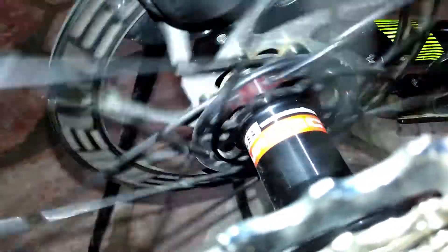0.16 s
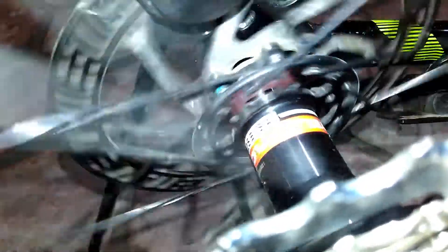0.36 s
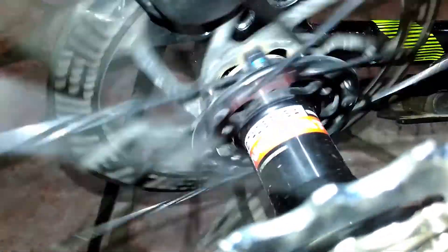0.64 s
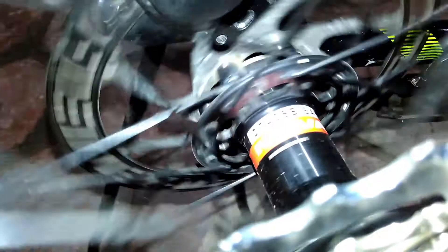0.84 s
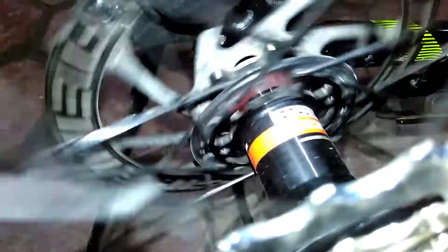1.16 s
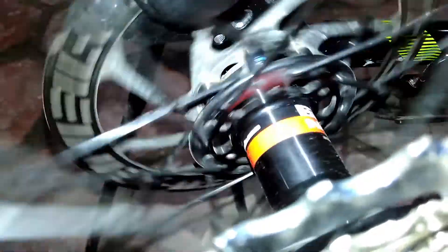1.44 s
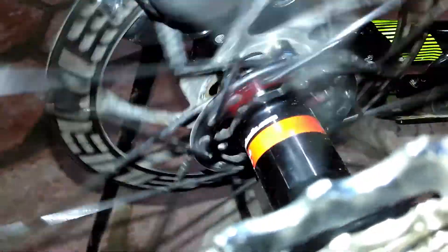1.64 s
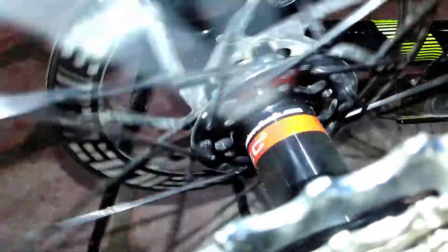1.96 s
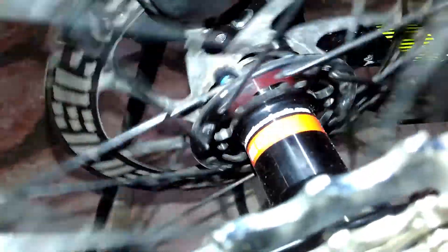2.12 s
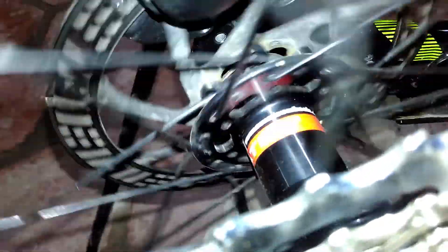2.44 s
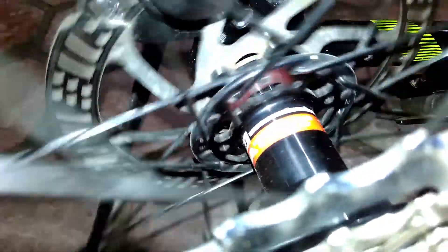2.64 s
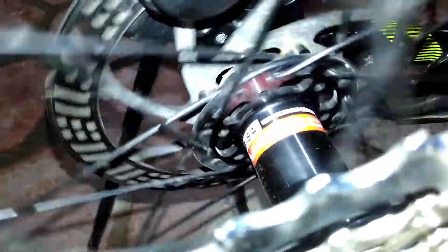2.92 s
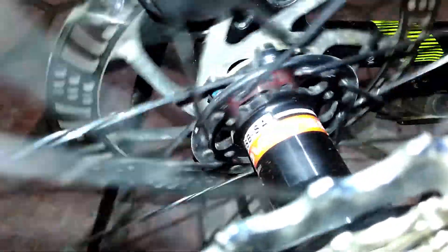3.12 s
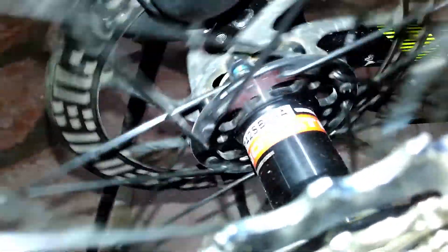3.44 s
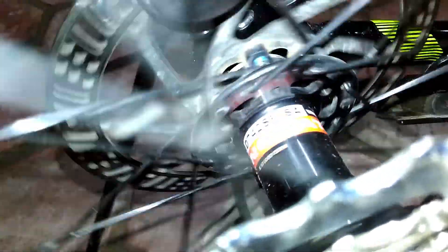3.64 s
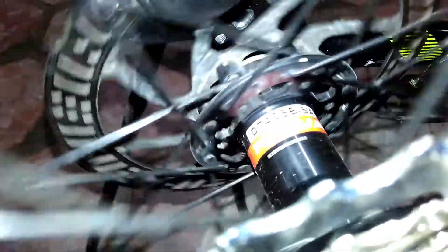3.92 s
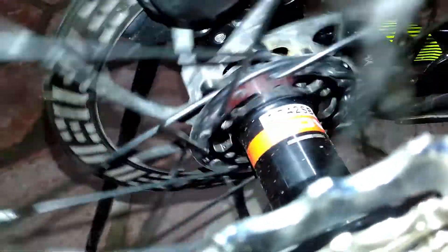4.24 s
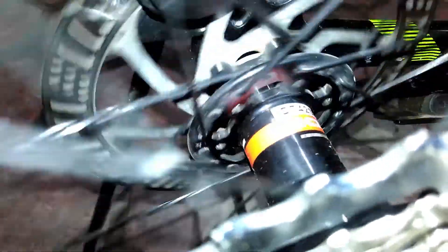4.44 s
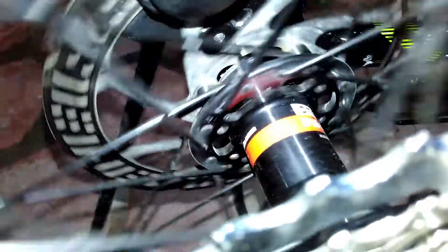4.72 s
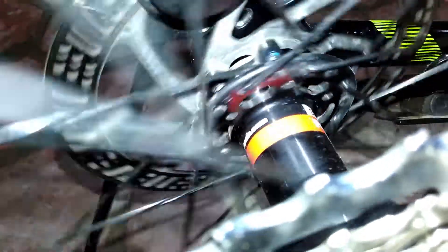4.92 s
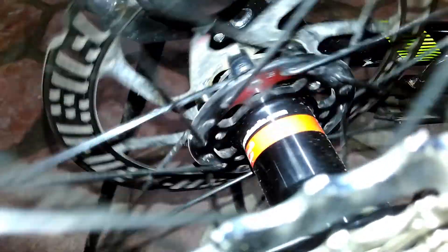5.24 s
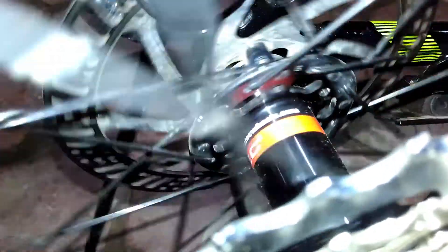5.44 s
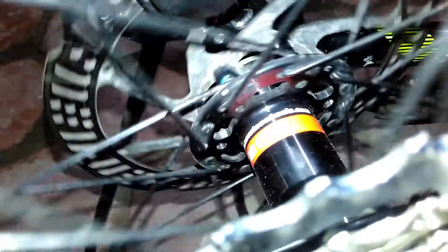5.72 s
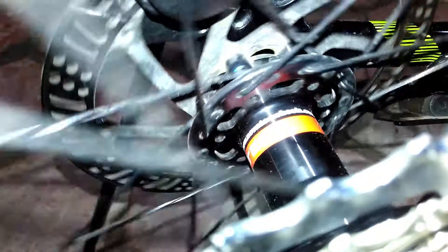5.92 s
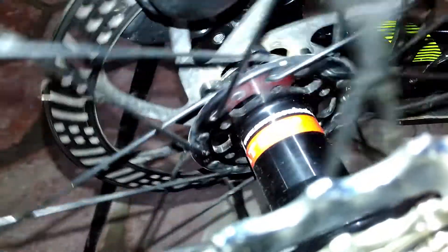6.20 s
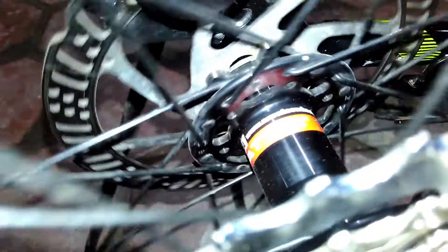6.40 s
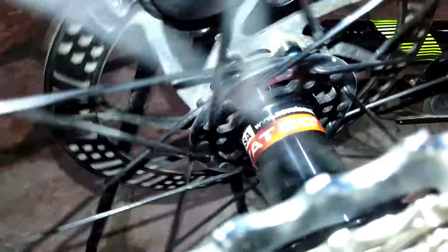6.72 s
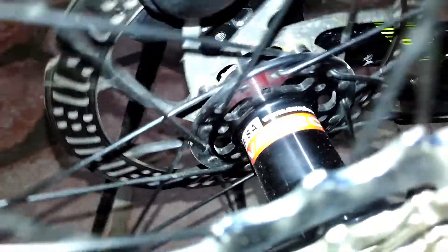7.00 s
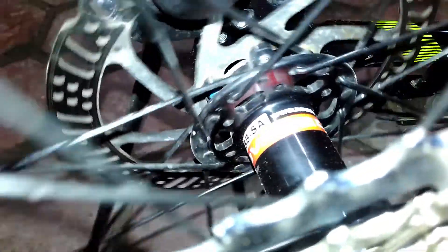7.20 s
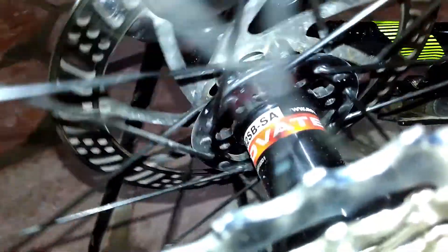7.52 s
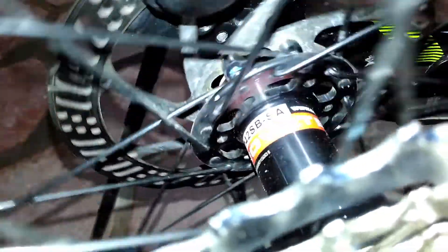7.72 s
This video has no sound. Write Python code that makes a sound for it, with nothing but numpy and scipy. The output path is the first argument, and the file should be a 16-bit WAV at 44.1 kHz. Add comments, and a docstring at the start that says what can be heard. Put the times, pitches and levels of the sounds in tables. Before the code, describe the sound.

A bicycle wheel coasts outdoors with the microphone right by its rear hub. The ratchet gives loud, bright, metallic clicks, each with a brief ring, mostly on the left and slightly overloaded. They begin as a quick run and gradually spread out, still ticking at the end. Underneath, a low drone like a nearby motor fades away over a faint hiss.

```python
"""Outdoors, close to the hub of a bicycle wheel that is coasting down. The freehub pawls drop off each
ratchet tooth and set hub, rotor and spokes ringing; a soft rubbing swish and a lone spoke tick pass.
The left microphone port sits by the hub and overloads. The right one is covered and hears mostly a low
drone, probably a motor nearby, that fades away over a faint outdoor hiss."""
import sys
import numpy as np
from scipy import signal
from scipy.fft import rfft, irfft
from scipy.io import wavfile

SR = 44100
rng = np.random.default_rng(int(sys.argv[2]) if len(sys.argv) > 2 else 0)


def store_pcm(level_fs):
    """Save levels as 16-bit WAV."""
    pcm = np.round(np.clip(level_fs, -1, 1) * 32767).astype(np.int16)
    wavfile.write(sys.argv[1], SR, np.atleast_2d(pcm).T)


N = 346626

# one row a ratchet tooth: t/s, bouncing time/ms, delay of the hardest pawl/ms, its relative level/dB
TEETH = [(0.0, 1.3, 2.43, -11.5), (0.085, 6.7, 3, -15), (0.1705, 7.7, 7.4, -10.5), (0.259, 6.7, 4, -12),
         (0.3466, 11, 2.7, -13.5), (0.4341, 6.4, 5, -11.5), (0.5207, 3.9, 1.8, -9.5),
         (0.6073, 7.3, 2.7, -12), (0.6937, 3.5, 5.36, -11.5), (0.7809, 2.5, 5.6, -10.5),
         (0.867, 6.3, 4.35, -12), (0.9524, 4.3, 3.3, -15), (1.0386, 5.7, 1, -9), (1.1218, 7.4, 0.78, -15),
         (1.2097, 3.6, 2.24, -6), (1.2979, 4.8, 2.75, -15), (1.3895, 5.6, 2.4, -14),
         (1.4816, 5, 4.7, -11.5), (1.5812, 6.2, 3.94, -9), (1.6843, 7.3, 1.86, -10),
         (1.7915, 7.9, 1.94, -9.5), (1.9024, 8.7, 7.6, -8.5), (2.0169, 10.8, 1.67, -11.5),
         (2.1337, 6.6, 1.78, -15.5), (2.2523, 9.1, 8.1, -9.5), (2.3741, 9.6, 6.45, -11),
         (2.5, 8.5, 3.8, -6.5), (2.628, 11.8, 4.2, -9), (2.761, 11.5, 5, -6), (2.8948, 10.8, 6.3, -12.5),
         (3.0303, 8.4, 2.24, -14.5), (3.1668, 8.2, 1.36, -15.5), (3.301, 4.3, 4.32, -7.5),
         (3.4358, 6.8, 6.8, -16), (3.5681, 6.4, 5.1, -9.5), (3.699, 10.3, 5.9, -7),
         (3.8309, 4.1, 4.9, -10.5), (3.96, 7.4, 2.57, -8), (4.0875, 3.5, 3.7, -18), (4.215, 7, 3.1, -16.5),
         (4.3409, 2.9, 2.5, -8), (4.466, 5.4, 4, -19.5), (4.5912, 5.8, 1.5, -9), (4.718, 6.5, 5.7, -11.5),
         (4.8486, 9, 3.7, -9.5), (4.9821, 8.5, 1.44, -8.5), (5.121, 6.3, 6.1, -12), (5.263, 7.5, 8.1, -9),
         (5.4105, 12.4, 8.4, -11), (5.566, 11.2, 1.1, -9.5), (5.727, 6.5, 7.35, -13.5),
         (5.8959, 14.4, 10.6, -5), (6.075, 8.5, 2.3, -11), (6.2646, 12.8, 11.9, -13),
         (6.4656, 13, 2.5, -9.5), (6.6776, 12, 4.9, -17), (6.8972, 9.8, 9.1, -12), (7.1258, 13, 7.6, -13.5),
         (7.3538, 15.3, 6.9, -12.5), (7.5805, 9.7, 1.6, -11), (7.8046, 11.8, 8.8, -12.5)]
# the short, bright modes of pawls and ratchet: f/Hz
RATCHET_HZ = [7900, 8890, 9243, 10870, 11060, 11925, 12570, 12720, 12940, 13300, 13650]
# for each of those modes: relative level/dB, t60/s
RATCHET_MODES = [(-11.5, 0.022), (-13, 0.026), (-11, 0.024), (-8, 0.017), (-4, 0.029), (-9.5, 0.064),
                 (1, 0.045), (-7.5, 0.014), (-1, 0.041), (-9, 0.016), (-25, 0.036)]
# groups of spokes and rotor arms of nearly equal pitch: centre f/Hz
WHEEL_HZ = [1900, 2080, 3060, 5340, 5940, 7865, 8135, 8345, 8640, 9243, 10120, 10870, 11150, 11925, 12450,
            12570, 12930, 13650, 13900]
# for each of those groups: width/Hz, relative level/dB, t60/s
WHEEL_GROUPS = [(80, -16, .2), (80, -14, .2), (200, -24, .15), (100, -25, .15), (100, -25, .15),
                (30, -8, .2), (50, -10, .2), (25, -11, .25), (40, -13, .25), (22, -1, .17), (65, -11, .18),
                (50, -3, .2), (80, -6, .2), (32, -5, .18), (60, -4, .2), (70, -5, .22), (75, -5, .22),
                (60, -5, .2), (80, -6, .15)]
# dense modes and near reflections: f/Hz, relative density/dB, t60/s
WASH = [(199, -14, 0.055), (826, -30.5, 0.15), (2190, -19, 0.19), (3580, -12, 0.085), (5660, -23, 0.17),
        (8180, -0.5, 0.066), (9500, 6, 0.024), (12600, -6, 0.16), (14000, -38, 0.06)]
# the hub as the covered port hears it: f/Hz, relative density/dB
COVERED_SPECTRUM = [(200, -85), (1000, -78), (2500, -73), (4000, -84), (8000, -82), (14000, -79)]
# the drone at the right port: t/s, fundamental/dB, octave/dB, rumble/dB
DRONE_LEVELS = [(0.0, -30, -36, -37), (0.1, -32, -40, -40), (0.25, -42, -40.5, -41),
                (0.6, -32.5, -42.5, -42.5), (0.72, -35, -40, -44.5), (0.8, -39, -61, -44.5),
                (0.9, -55, -44, -45), (1.0, -39, -55, -49), (1.1, -33.5, -54, -53), (1.3, -33, -62, -58.5),
                (1.5, -43.5, -63, -55), (1.6, -40, -64, -56.5), (2.1, -42, -66, -60),
                (2.2, -50, -55, -58.5), (2.35, -43, -75, -57.5), (3.15, -54.5, -64.5, -64),
                (3.65, -50, -72, -65), (4.65, -49, -68, -65.5), (4.9, -57, -69, -67),
                (6.4, -59.5, -74, -70.5), (7.86, -64, -68, -71)]
# the rumble under the drone: f/Hz, relative density/dB
RUMBLE_SPECTRUM = [(40, -4), (130, -7), (250, 1), (400, -1.5), (700, -8), (1000, -7), (1500, -19.5),
                   (2200, -34), (5000, -72)]
# open-air hiss: f/Hz, left density/dB, right density/dB
HISS_SPECTRUM = [(42, -98, -90), (258, -116, -90), (710, -102, -101), (1430, -102, -108), (2120, -93, -108),
                 (2970, -101, -110), (4240, -107, -118), (6000, -104, -118), (6370, -84, -114),
                 (7400, -79, -113), (8000, -95.5, -113), (14000, -101, -114)]
# the swell of the rubbing: t/s, level/dB
SWISH_LEVELS = [(3.8, -87), (3.88, -52), (4.05, -51.5), (4.2, -50), (4.3, -83)]
# the lone spoke tick: t/s, relative level/dB
SPOKE_TICKS = [(6.026, 12)]


def amp(db):
    """Decibels to amplitude."""
    return 10 ** (np.asarray(db) / 20)


def unit_rms(x):
    return x / np.sqrt(np.mean(x ** 2) + 1e-20)


def at_hz(table, hz, column=1):
    """Column of a spectrum table, interpolated on a log-frequency axis."""
    table = np.array(table)
    return np.interp(np.log(hz), np.log(table[:, 0]), table[:, column])


def coloured(table, column=1):
    """Steady noise whose density follows the table, in dB per Hz."""
    hz = np.maximum(np.fft.rfftfreq(N, 1 / SR), 10)
    return irfft(rfft(rng.standard_normal(N)) * amp(at_hz(table, hz, column)) * np.sqrt(SR / 2), N)


def wander(hz):
    """Random motion of unit rms, mostly slower than hz."""
    return unit_rms(signal.sosfilt(signal.butter(1, hz, fs=SR, output="sos"), rng.standard_normal(N)))


def band(x, low_hz, high_hz, order=2):
    return signal.sosfilt(signal.butter(order, [low_hz, high_hz], "band", fs=SR, output="sos"), x)


def decay(x, t60):
    """Each value leaves an exponential tail."""
    return signal.lfilter([1], [1, -amp(-60 / (t60 * SR))], x + 1e-18)


def ring_envelope(chatter, t60):
    """Amplitude of a body that stores the chatter's energy and then dies away."""
    return np.sqrt(decay(chatter ** 2, t60 / 2) / (SR / 100))


def pawl_contacts(bounces_per_s=1800, uneven_db=4.0, slip_ms=3.1, slip_db=-30, rise_db_per_s=0.185):
    """Sprung pawls slide off each crest, land and bounce: chatter level, impacts, hard hits, tooth."""
    chatter, hard_hits, tooth = np.zeros(N), np.zeros(N), np.zeros(N, int)
    scatter = rng.standard_normal((len(TEETH), 2))
    for k, (s, bounce_ms, hard_ms, hard_db) in enumerate(TEETH):
        # the springs give each tooth nearly the same energy, so long bouncing is softer
        db = -0.83 + rise_db_per_s * s - 10 * np.log10(bounce_ms)
        land = round(s * SR)
        slip = max(land - round(slip_ms * SR / 1000), 0)
        tooth[slip:] = k
        chatter[slip:land] = amp(db + np.linspace(slip_db, slip_db / 3, land - slip))
        chatter[land:land + round(bounce_ms * SR / 1000)] = amp(db)
        # a softer pawl lands late if the hardest is early, and early if it is late
        soft_ms = abs((7.2 if hard_ms < 4.4 else 1.9) + 0.72 * scatter[k, 0])
        soft_db = hard_db - 7 + 3 * scatter[k, 1]
        hard_hits[land + round(hard_ms * SR / 1000)] += amp(hard_db)
        hard_hits[land + round(soft_ms * SR / 1000)] += amp(soft_db)
    sizes = amp(uneven_db * rng.standard_normal(N)) * rng.choice([-1, 1], N)
    bounces = sizes * (rng.random(N) < bounces_per_s / SR)
    landings = np.zeros(N)
    landings[[round(row[0] * SR) for row in TEETH]] = 1.17   # the first pawl always lands on time
    return chatter, chatter * (bounces + landings), hard_hits, tooth


def ratchet_ring(impacts, tooth, spread_db=1.43):
    """The impacts strike every mode of pawls and ratchet, with a new strength at each tooth."""
    ring = np.zeros(N)
    for hz, (level_db, t60) in zip(RATCHET_HZ, RATCHET_MODES):
        radius, angle = amp(-60 / (t60 * SR)), 2 * np.pi * hz / SR
        poles = [1, -2 * radius * np.cos(angle), radius ** 2]
        strength = amp(level_db + spread_db * rng.standard_normal(len(TEETH)))[tooth]
        ring += signal.lfilter([0, np.sin(angle)], poles, impacts * strength + 1e-18)
    return amp(-7) * ring


def wheel_ring(chatter, tooth, spread_db=3.5):
    """Spokes and rotor arms of near pitch beat roughly: each group is a narrow band of dying noise."""
    ring, white = np.zeros(N), rng.standard_normal(N)
    for hz, (width_hz, level_db, t60) in zip(WHEEL_HZ, WHEEL_GROUPS):
        strength = amp(level_db + spread_db * rng.standard_normal(len(TEETH)))[tooth]
        beating = unit_rms(band(white, hz - width_hz / 2, hz + width_hz / 2, order=1))
        ring += ring_envelope(chatter * strength, t60) * beating
    return amp(-15.5) * ring


def pawl_noise(chatter, hard_hits, thud_t60=0.012):
    """Hard landings thud and the chatter scratches, both as broad noise."""
    thud = band(decay(hard_hits, thud_t60) * rng.standard_normal(N), 29.4, 7050, order=1)
    scratch = band(chatter * rng.standard_normal(N), 224, 19000, order=1)
    return amp(6.5) * thud + amp(-9) * scratch


def wash(chatter, grain_db=3.5, late_db=-12.5, late_stretch=3.47):
    """Dense modes and near reflections die away in third-octave bands; loose parts make them grainy."""
    bands, white = np.zeros(N), rng.standard_normal((2, N))
    edges_hz = 160 * 2 ** np.arange(0, 6.7, 1 / 3)
    for k, (low, high) in enumerate(zip(edges_hz, edges_hz[1:])):
        hz = np.sqrt(low * high)
        t60 = at_hz(WASH, hz, column=2)
        early = ring_envelope(chatter, t60)
        late = amp(late_db) * ring_envelope(chatter, late_stretch * t60)
        bands += amp(at_hz(WASH, hz)) * (early + late) * band(white[k % 2], low, high)
    return amp(-1 + grain_db * wander(hz=250)) * bands


def covered_port(chatter):
    """Through the cover each click is a short, dull blur with a faint long tail."""
    blur = ring_envelope(chatter, t60=0.04) + amp(-15) * ring_envelope(chatter, t60=0.6)
    return blur * coloured(COVERED_SPECTRUM)


def freehub():
    """The pawls drive ratchet and wheel: close up on the left, through the cover on the right."""
    chatter, impacts, hard_hits, tooth = pawl_contacts()
    ringing = ratchet_ring(impacts, tooth) + wheel_ring(chatter, tooth)
    close = ringing + pawl_noise(chatter, hard_hits) + wash(chatter)
    return np.array([close, covered_port(chatter)])


def drone(hz=82.3, waver_hz=1.86, left_lead_s=0.00027):
    """Probably a nearby motor: two wavering tones over a rumble, nearly opposite in the two ports."""
    s, *columns = np.transpose(DRONE_LEVELS)
    low, octave, rumble = [amp(np.interp(np.arange(N) / SR, s, db)) for db in columns]
    phase = 2 * np.pi * np.cumsum(hz + waver_hz * wander(hz=6)) / SR
    shared, left_only = unit_rms(coloured(RUMBLE_SPECTRUM)), unit_rms(coloured(RUMBLE_SPECTRUM))
    left_rumble = 0.91 * np.roll(shared, -round(left_lead_s * SR)) + 0.76 * left_only
    left_tones = amp(0.3) * low * np.sin(phase + 0.27) + amp(5.3) * octave * np.sin(2 * phase + 0.46)
    right_tones = low * np.sin(phase) + octave * np.sin(2 * phase)
    left = np.sqrt(2) * left_tones + amp(3) * rumble * left_rumble
    right = np.sqrt(2) * right_tones + rumble * shared
    return np.array([left, -right])


def outdoor_hiss():
    """A faint, steady bed of noise, separate in each port."""
    return np.array([coloured(HISS_SPECTRUM, column=1), coloured(HISS_SPECTRUM, column=2)])


def rubbing_swish(band_hz=(3030, 3430)):
    """Soft rubbing: a narrow band of noise that swells once."""
    s, db = np.transpose(SWISH_LEVELS)
    swell = amp(np.interp(np.arange(N) / SR, s, db, left=-120, right=-120))
    return swell * unit_rms(band(rng.standard_normal(N), *band_hz))


def spoke_tick():
    """A spoke gives one bright snap, then a few milliseconds of rattle."""
    click = np.zeros(N)
    for s, db in SPOKE_TICKS:
        click[round(s * SR)] = amp(db)
    rattle = band(decay(click, t60=0.022) * rng.standard_normal(N), 3100, 13000, order=1)
    return band(click, 10800, 13400) + amp(-30.5) * rattle


def scene():
    """The sound at the two ports; tick and swish reach only the left one, by the hub."""
    left_only = np.array([[1], [0]])
    return outdoor_hiss() + freehub() + left_only * (spoke_tick() + rubbing_swish()) + drone()


def record(dry, deaf_above_hz=14500, overload=0.72, cutoff_hz=16100):
    """The microphone loses the top treble, close peaks clip, and a steep low-pass follows."""
    heard = signal.sosfilt(signal.cheby2(12, 32, deaf_above_hz, fs=SR, output="sos"), dry)
    clipped = np.clip(heard, -overload, overload)
    return signal.sosfilt(signal.cheby2(16, 80, cutoff_hz, fs=SR, output="sos"), clipped)


dry = scene()
out = record(dry)
store_pcm(out)
```